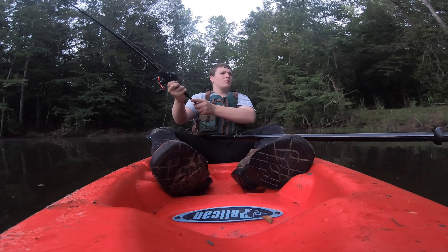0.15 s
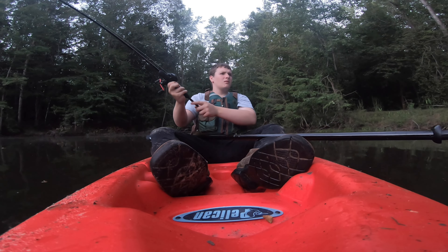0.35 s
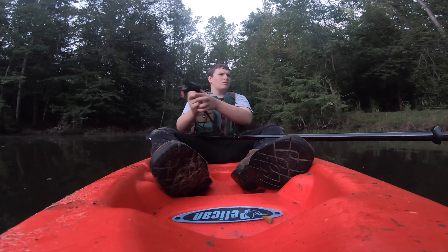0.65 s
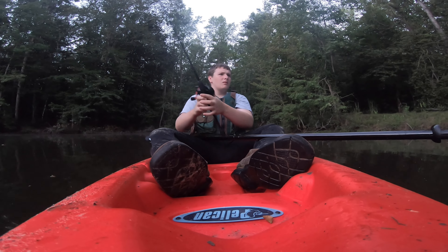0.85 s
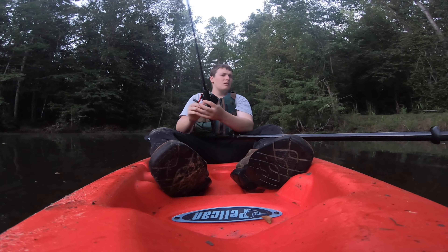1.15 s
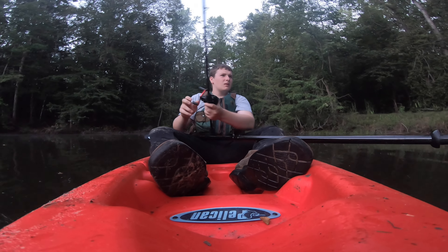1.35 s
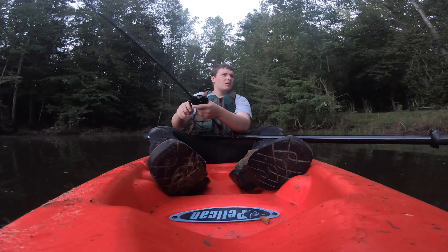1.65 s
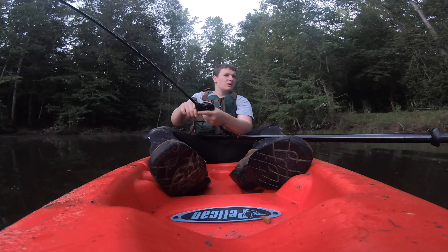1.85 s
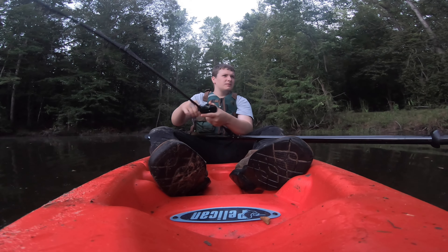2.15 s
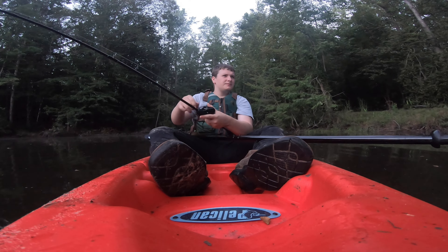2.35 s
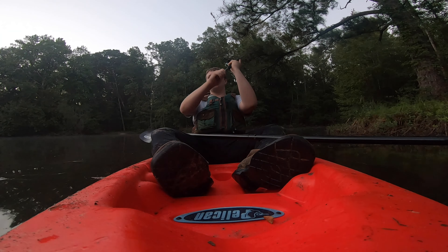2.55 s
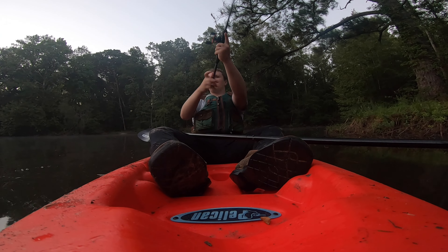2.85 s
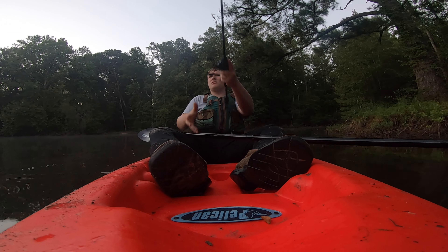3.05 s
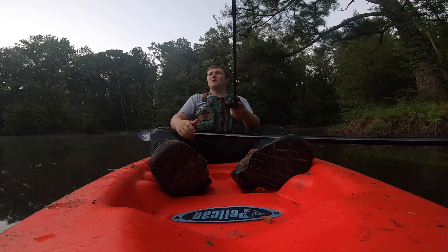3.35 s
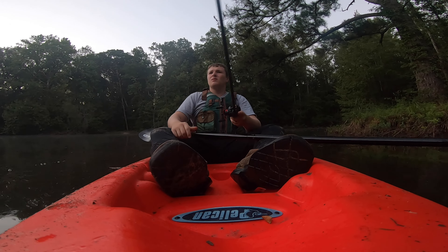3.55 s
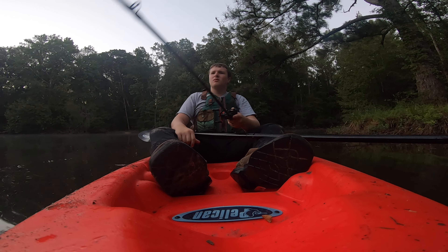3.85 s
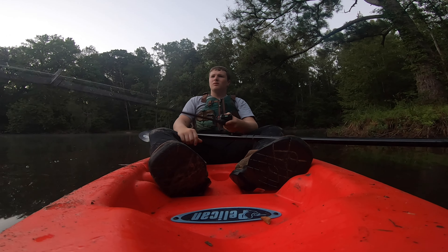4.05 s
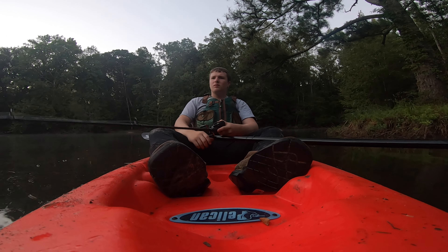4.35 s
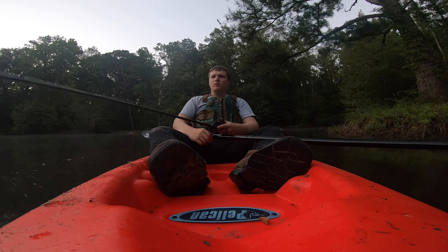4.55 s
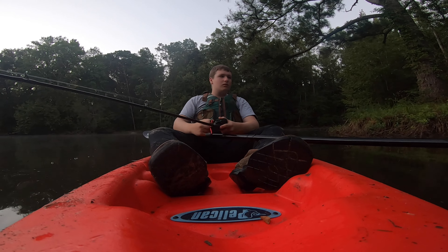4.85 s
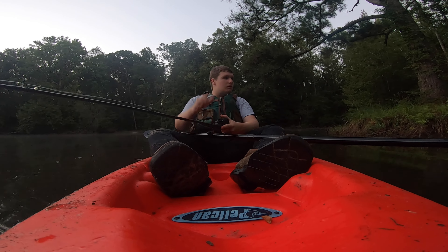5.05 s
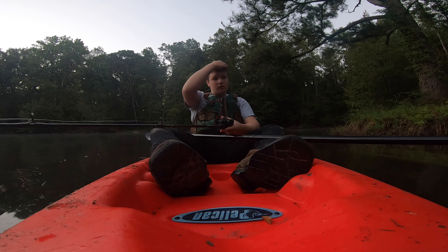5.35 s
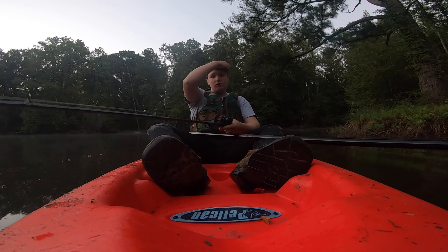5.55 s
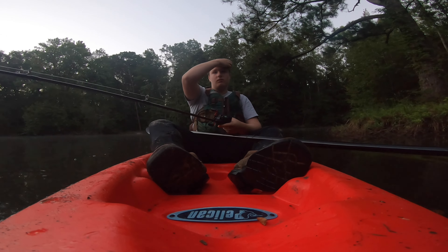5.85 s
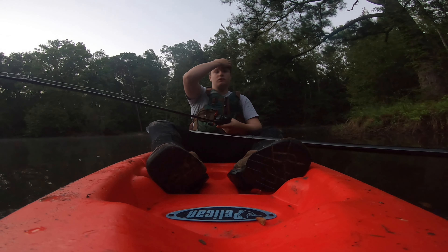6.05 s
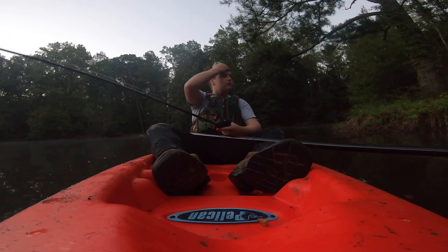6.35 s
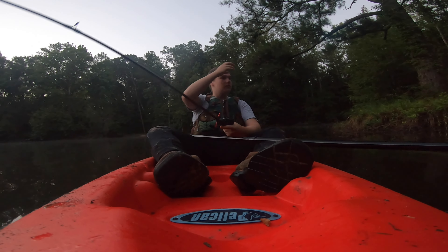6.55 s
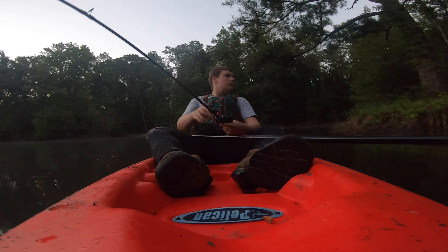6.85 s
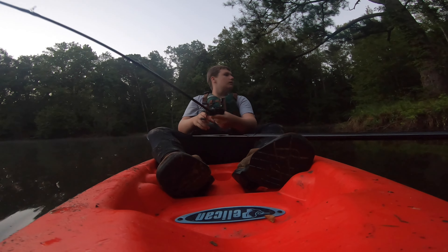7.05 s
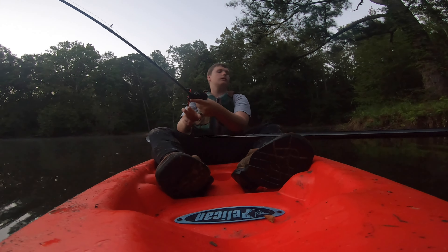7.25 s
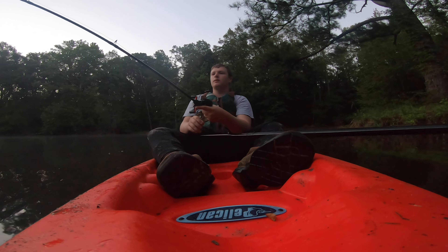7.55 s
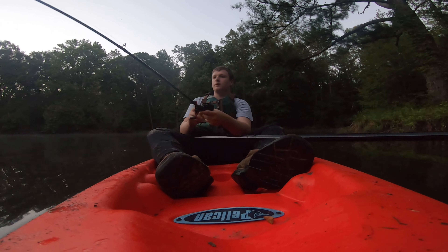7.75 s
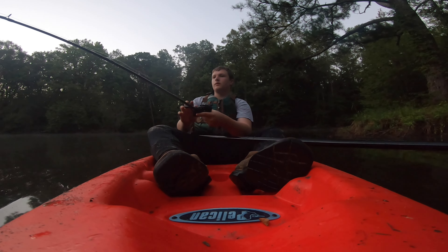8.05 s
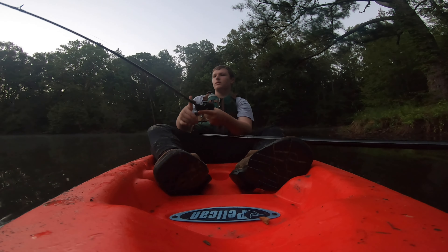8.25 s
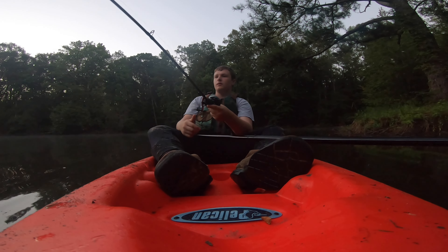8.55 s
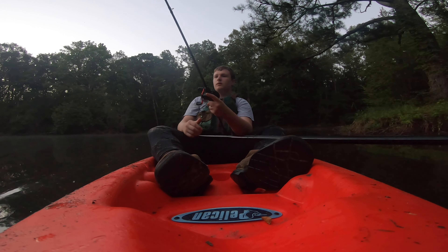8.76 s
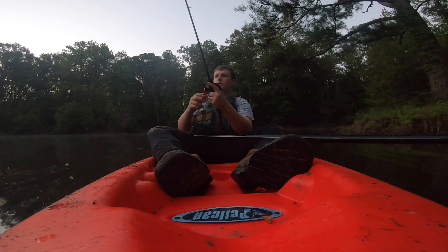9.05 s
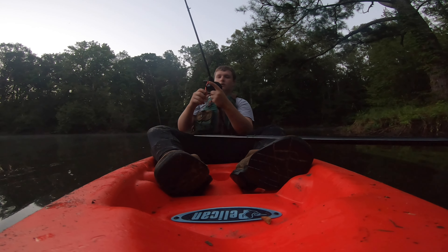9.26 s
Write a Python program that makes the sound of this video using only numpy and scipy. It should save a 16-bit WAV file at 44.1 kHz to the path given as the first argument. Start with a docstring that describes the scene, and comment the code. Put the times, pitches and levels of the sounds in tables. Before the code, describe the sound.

From a plastic kayak on a pond, a high, rasping insect buzzes over a constant insect chorus, with scattered frog twangs and far crows. A reel latch snaps and a cast follows with a brief hiss and whirr. The reel clicks again, and a paddle scrapes and squeaks close by, thumping the hollow hull. Then sleeves rustle, the frogs and crows call more often, and a small bird faintly repeats two slurred notes.

```python
"""Morning on a wooded pond, heard from the bow of a plastic kayak.
Far insects drone throughout; a near one buzzes first, scraper on file, as green frogs twang and crows caw.
An angler's reel latch clicks and he casts: the line hisses, the spool whirrs until his thumb stops it.
Then the paddle scrapes, squeaks and bumps on the hollow hull, and trapped air gulps underneath.
At the end frogs and crows grow busier, sleeves rustle and a small bird repeats two slurred notes."""
import sys
import numpy as np
from scipy import signal
from scipy.fft import rfft, irfft, next_fast_len
from scipy.io import wavfile

SR = 44100
rng = np.random.default_rng(int(sys.argv[2]) if len(sys.argv) > 2 else 0)


def transcribe(signal):
    """Save signal, clipped to [-1, 1], as a 16-bit WAV file at the path in sys.argv[1]."""
    frames = np.atleast_2d(signal).T
    limited = np.clip(frames, -1, 1)
    pcm = np.round(limited * 32767).astype(np.int16)
    wavfile.write(sys.argv[1], SR, pcm)


N = 414099
TIME, FREQS = np.arange(N) / SR, np.fft.rfftfreq(N, 1 / SR)


# paddle shoves: peak_s, rise_s, fall_s, scrape_db, rumble_db (all table levels are relative)
SHOVES = [(5.459, 0.075, 0.084, -38, -31), (5.735, 0.053, 0.062, -36, -32),
          (6.292, 0.055, 0.023, -38, -33.5)]
# shaft on plastic: freq_hz, density_db
SCRAPE_SPECTRUM = [(120, -38), (200, -5.5), (278, -2.5), (448, -11.5), (709, -7.5), (1080, -13.5),
                   (1320, -7.5), (1840, -19), (2020, -16.5), (2210, -17.5), (6880, -30.5), (10100, -35),
                   (16000, -44)]
# shaken hull: freq_hz, density_db
RUMBLE_SPECTRUM = [(12, -50), (20, -39), (38, -6.5), (125, 3), (147, -2.5), (173, -10.5), (206, -17),
                   (285, -13), (366, -20.5), (400, -20), (520, -50), (880, -120)]
RUMBLE_LINGER_S, ROCK_HZ = 0.031, 103

def paddle_scrape():
    """The shaft scrapes over plastic and shakes the hull, whose sides move oppositely below ROCK_HZ."""
    sliding = sum(amp(db) * shove(s, rise, fall) for s, rise, fall, db, _ in SHOVES)
    shaking = sum(amp(db) * shove(s, rise, fall + RUMBLE_LINGER_S) for s, rise, fall, _, db in SHOVES)
    scrape = amp(5.5) * sliding * noise(SCRAPE_SPECTRUM, right_db=0.5, same=0.1, grain_db=2)
    rumble = noise(RUMBLE_SPECTRUM, right_db=-6, same=0.2)
    rocking = lowpass(rumble[0], hz=ROCK_HZ, order=4) * np.array([[-.7], [1]])
    return scrape + shaking * (amp(2.5) * highpass(rumble, hz=ROCK_HZ) + amp(5) * rocking)


# stick-slip bursts: start_s, length_s, level_db, slips_per_s
SQUEAKS = [(5.7108, 0.0057, -13, 1100), (5.72, 0.022, -15, 1200), (5.739, .028, -18.5, 1020),
           (5.762, 0.026, -21.5, 1080)]
# paddle shaft: freq_hz, width_hz, level_db
SHAFT_MODES = [(1150, 100, -2), (1750, 160, -4.5), (2234, 140, 5.5), (2730, 360, -10), (3045, 170, 5),
               (3370, 310, 3.5), (4000, 220, -6.5), (6960, 900, -23)]
# deck: freq_hz, width_hz, level_db
DECK_MODES = [(820, 63, -19), (1000, 36, 0.5), (1135, 31, -13), (1290, 52, 10)]

def paddle_squeak():
    """The paddle sticks and slips fast enough to squeak, ringing shaft and deck."""
    slips = np.zeros(N)
    for s, length, db, rate in SQUEAKS:
        u = progress(length)
        cycles = np.cumsum(rate * (1 + .04 * drift(600, len(u)))) / SR
        jerks = unit(np.diff(np.floor(cycles), prepend=-1)) + .9 * rng.standard_normal(len(u))
        add(slips, s, amp(db) * jerks * np.interp(u, [0, .08, .55, 1], [0.31, 0.79, 0.73, 0.14]))
    slips = lowpass(slips, hz=8000, order=2)  # soft plastic rounds each slip
    deck = amp(-0.5) * ring(slips, DECK_MODES) * np.array([[-.9], [1]])  # halves flex oppositely
    shaft = amp(-2) * woods(ring(slips, SHAFT_MODES), near_db=-7.5, far_db=-36.5)
    return highpass(shaft + deck, hz=515)


# bumps on the hull: start_s, level_db, push_s
BUMPS = [(4.326, -60, 0.0056), (4.36, -40.5, 0.014), (5.421, -30, 0.0055), (5.469, -30, 0.0081),
         (5.717, -47, 0.0041), (5.804, -29, 0.015), (5.87, -31.5, 0.016), (6.3, -17, 0.013),
         (6.455, -32.5, 0.015), (7.258, -53, 0.0029), (8.471, -55.5, 0.0047)]
# hollow shell: freq_hz, width_hz, level_db
HULL_MODES = [(54.3, 3, 14), (90, 14, -16), (108, 14, 9), (140, 20, -9), (215, 35, -20)]

def hull_bumps():
    """Soft pushes ring the shell: the lowest mode rocks its sides oppositely, the rest swell it."""
    pushes = np.zeros(N)
    for s, db, length in BUMPS:
        push = np.hanning(max(round(length * SR), 4))
        add(pushes, s, amp(db + 33.5) * push / push.sum())
    rock = amp(-2) * ring(pushes, HULL_MODES[:1])
    swell = amp(-1) * ring(pushes, HULL_MODES[1:])
    return np.array([swell - amp(-6.5) * rock, swell + rock])


# course of the cast: time_s, hiss_db, spool_db
CAST_LEVELS = [(2.62, -69, -72), (2.78, -67, -62.5), (2.85, -48, -48.5), (2.906, -49, -53.5),
               (2.986, -58.5, -56.5), (3.338, -55, -61), (3.438, -57, -64), (3.838, -53.5, -64),
               (3.996, -59, -57), (4.07, -74, -59)]
# line in the guides: freq_hz, density_db
LINE_SPECTRUM = [(4500, -29), (6500, -7), (8500, 1), (9200, -8), (10200, -17.5), (11500, -15.5),
                 (15500, -20)]
# spinning spool: freq_hz, density_db
SPOOL_SPECTRUM = [(250, -16), (650, -2), (1000, -4.5), (1500, -7.5), (2200, -3), (2950, 1), (4000, -2),
                  (5500, -6), (8000, -28)]
SPOOL_START_S, SPOOL_STOP_S, BRAKE_S = 2.6, 4.01, 0.025
ZIP_HZ, ZIP_RISE_HZ_PER_S, ZIP_WIDTH_HZ = 7560, 1100, 1100
WHINE_HZ, WHINE_SAG_HZ_PER_S, FLUTTER_HZ = 723, 150, 2955

def cast():
    """Line hisses through the guides with a rising zip; the spool whirrs and slows till a thumb stops it."""
    since = TIME - SPOOL_START_S
    zipping = sine(ZIP_HZ + ZIP_RISE_HZ_PER_S * since) * np.array([drift(ZIP_WIDTH_HZ) for _ in range(2)])
    hiss = amp(2.5) * noise(LINE_SPECTRUM, right_db=11, same=0.19, grain_db=2.5)
    hiss += amp(-1.5) * place(zipping, right_db=8, same=0.18)
    whirr = amp(2) * noise(SPOOL_SPECTRUM, right_db=-0.5, same=0.68, grain_db=1.5)
    whine = amp(-13) * sine(WHINE_HZ - WHINE_SAG_HZ_PER_S * since) * (1 + .6 * drift(60))
    flutter = amp(-2) * np.sin(2 * np.pi * FLUTTER_HZ * TIME) * drift(520)
    spool = amp(3.5) * level(CAST_LEVELS, column=2) * (whirr + whine + flutter)
    brake = np.exp(-np.maximum(TIME - SPOOL_STOP_S, 0) / BRAKE_S)
    return brake * (level(CAST_LEVELS, column=1) * hiss + spool)


# single clicks of reel and rod: start_s, level_db, pawl_db, grip_db
CLICKS = [(.238, -62, 20, 3), (.885, -51, -8, -21), (4.008, -47, -12, 12), (4.3246, -39.5, -30, 8),
          (5.269, -52, 11, -2), (6.289, -39, -14, -8), (7.115, -53, 2, 9), (8.019, -42, -5, -6)]
# reel frame: freq_hz, width_hz, level_db
FRAME_MODES = [(2880, 87, 4), (3120, 250, 5.5), (4195, 1600, -4)]
# rod and grip: freq_hz, width_hz, level_db
GRIP_MODES = [(740, 200, 3), (1260, 37, 3), (1399, 290, 5.3)]
# steel pawl: freq_hz, width_hz, level_db
PAWL_MODES = [(8040, 860, 14), (8100, 610, 6.6)]

def reel_clicks():
    """Each click is a tiny rattle of parts that rings the frame, the hollow grip and the pawl."""
    frame, grip, pawl = np.zeros((3, N))
    t = np.arange(SR // 100) / SR
    for s, db, pawl_db, grip_db in CLICKS + latch_clicks():
        rattle = rng.choice([-1, 1], len(t)) * np.exp(-t / 0.0028)
        rattle[0] += 3  # first impact
        add(frame, s, amp(db) * rattle)
        add(pawl, s, amp(db + pawl_db) * rattle)
        add(grip, s, amp(db + grip_db) * rattle)
    ringing = amp(4) * ring(frame, FRAME_MODES) + amp(-0.5) * ring(grip, GRIP_MODES)
    ringing += amp(-3) * ring(pawl, PAWL_MODES)
    return place(woods(highpass(ringing, hz=685), near_db=-12, far_db=-30.5), right_db=0.5, same=0.8)


# latch throws: start_s, length_s, level_db, first_blow_db
LATCH_THROWS = [(2.1473, .0518, -21, -9.5), (4.7653, .067, -24, -3)]
# snap, strike, knock on the grip, rebound: length_share, level_db, pawl_db, grip_db
LATCH_BLOWS = [(0, -3, 14, 4), (.116, 0, -6.5, -14), (.297, -26.5, -15, 18.5), (1, -17.5, -17, -14)]

def latch_clicks():
    """Click rows for the reel's latch: every throw is the same run of blows, faster or slower."""
    return [(s + share * length, db + blow_db + (first_db if k == 0 else 0), pawl_db, grip_db)
            for s, length, db, first_db in LATCH_THROWS
            for k, (share, blow_db, pawl_db, grip_db) in enumerate(LATCH_BLOWS)]


# even, stumbling, then settled buzz: start_s, end_s, strokes_per_s, missed_share, level_db
BUZZ_BOUTS = [(0.014, 0.552, 78, 0, -39), (.565, 1.548, 91, .13, -39.5), (1.568, 2.53, 78, 0, -40.5)]

def near_insect():
    """Each wing stroke drags a scraper over a file: a short tone that slides downward."""
    out, t = np.zeros((2, N)), np.arange(round(.009 * SR)) / SR
    u = t / t[-1]
    sweep_hz = np.interp(u, [0, .25, .6, 1], [7050, 6320, 6070, 5490])
    envelope = np.interp(u, [0, .25, .55, .72, 1], [0.24, 0.48, 0.88, 0.53, 0])
    for start, end, rate, missed, db in BUZZ_BOUTS:
        for s in np.arange(start, end, 1 / rate):
            phase = 2 * np.pi * (np.cumsum(sweep_hz * rng.normal(1, 0.005)) / SR + rng.random())
            stroke = amp(db + rng.normal(4.4, 0.98)) * envelope * (rng.random() >= missed)
            add(out[0], s - t[-1] / 2, amp(-10) * stroke * np.cos(phase))  # far ear: shaded, out of step
            add(out[1], s - t[-1] / 2, stroke * np.sin(phase))
    return out


# green frog calls: start_s, level_db
TWANGS = [(0.177, -45), (.825, -55), (1.565, -41), (2.765, -39.5), (3.686, -44.5), (4.489, -38.5),
          (6.651, -44), (6.72, -46.5), (7.577, -43), (7.624, -42), (7.87, -40.5), (8.194, -41),
          (8.309, -43.5), (8.815, -53.5)]
# throat response: freq_hz, gain_db
FROG_THROAT = [(200, -5.5), (300, 4.5), (390, -4), (540, 2.5), (800, -4.5), (1050, -18), (1600, -20)]
FROG_HZ, FROG_FULL_DB, FROG_HZ_PER_DB = 166.76, -39, 0.83  # softer is slightly higher
FUNDAMENTAL_DECAY_S, OVERTONE_DECAY_S, OVERTONE_JITTER = 0.057, 0.054, 0.1706

def frogs():
    """A twang like a plucked string: a round fundamental under rough overtones that sag and die first."""
    out, t = np.zeros(N), np.arange(SR // 4) / SR
    for s, db in TWANGS:
        settled_hz = FROG_HZ + FROG_HZ_PER_DB * (FROG_FULL_DB - db)
        pitch_hz = settled_hz * (1 + .36 * np.exp(-t / .014) + .03 * drift(120, len(t)))
        body = amp(5) * np.sqrt(2) * sine(pitch_hz) * np.exp(-(t / FUNDAMENTAL_DECAY_S) ** 1.39)
        sagging_hz = pitch_hz * np.exp(-1.8 * t + OVERTONE_JITTER * drift(300, len(t)))
        twang = amp(3) * voice(sagging_hz, FROG_THROAT, tilt_db=-55 * t)
        twang *= (1 + 0.51 * drift(259, len(t))) * np.exp(-(t / OVERTONE_DECAY_S) ** 2)
        attack = 1 - np.exp(-t / 0.0017)
        add(out, s, amp(db - 5.5) * (body + twang) * attack)
    return place(woods(out, near_db=1, far_db=-10.5), right_db=-2, same=0.22)


# single crows: start_s, length_s, level_db
CAWS = [(1.172, 0.13, -54.5), (1.483, 0.12, -52.5), (1.912, .14, -50.5), (2.396, 0.069, -56.5),
        (2.475, 0.056, -52.5), (6.408, 0.21, -57.5), (6.601, 0.095, -58.5), (6.819, 0.16, -70),
        (7.028, 0.19, -55.5), (7.22, 0.23, -58.5), (7.423, .2, -55.5), (7.681, .22, -55.5),
        (7.961, 0.22, -59), (8.201, 0.28, -57.5), (8.9, 0.14, -59)]
# pitch of a caw: length_share, top_pitch_share
CAW_ARCH = [(0, .82), (.25, .95), (.45, 1), (.7, .92), (1, 0.77)]
# throat response: freq_hz, gain_db
CROW_THROAT = [(400, -33), (850, -22), (1150, 5), (1350, 5), (1750, -9.5), (2200, -25), (3000, -37)]
# far flock calling: start_s, end_s, level_db
FLOCK_SPELLS = [(1.2, 2.6, -68), (6.3, 9.39, -59)]
# far flock: freq_hz, density_db
FLOCK_SPECTRUM = [(950, -31), (1180, -2), (1360, 5), (1500, -12.5), (1750, -3.5), (2050, -32)]
CAW_TOP_HZ = 453.6

def crows():
    """Hoarse caws whose pitch arches and falls, over a flock blurred by distance."""
    out = np.zeros(N)
    for s, length, db in CAWS:
        u = progress(length)
        pitch_hz = CAW_TOP_HZ * (np.interp(u, *np.transpose(CAW_ARCH)) + .012 * drift(350, len(u)))
        hoarse = 1 + .42 * drift(300, len(u))
        caw = voice(pitch_hz, CROW_THROAT) * hoarse * signal.windows.tukey(len(u), .5)
        add(out, s, amp(db - 2.5) * caw)
    calling = spells(FLOCK_SPELLS, ramp_s=.15, fade_db_per_s=1.5) * amp(2 * drift(21))
    flock = calling * noise(FLOCK_SPECTRUM, right_db=0.5, same=0.097)
    return flock + woods(out, near_db=-12, far_db=-11)


# lone notes: start_s, length_s, level_db, start_hz, middle_hz, end_hz
WHISTLES = [(0.18, 0.3, -60, 1560, 1598, 1550), (0.57, 0.02, -57, 1060, 963, 935),
            (.662, 0.064, -61.5, 740, 774, 1000), (1.01, .024, -58, 5050, 4784, 4800)]
# one bird's repeated phrase: start_s, level_db
PHRASES = [(8.11, -69), (8.57, -69), (9.043, -66)]
# its slurs, up then down: delay_s, length_s, level_db, start_hz, middle_hz, end_hz
SLURS = [(0, 0.087, 0.5, 2650, 2800, 2880), (0.127, 0.095, -1.5, 2204, 2206, 1816)]

def songbirds():
    """Slurred whistles with a slight quaver, alone or paired in a phrase."""
    out = np.zeros(N)
    song = [(s + delay, length, db + note_db, *slur)
            for s, db in PHRASES for delay, length, note_db, *slur in SLURS]
    for s, length, db, start_hz, middle_hz, end_hz in WHISTLES + song:
        u = progress(length)
        pitch_hz = middle_hz + (np.where(u < .5, start_hz, end_hz) - middle_hz) * (2 * u - 1) ** 2
        quaver = 1 + .011 * drift(250, len(u))
        add(out, s, amp(db + 1.5) * sine(pitch_hz * quaver) * signal.windows.tukey(len(u), .3))
    return woods(out, near_db=5, far_db=-8)


# limbs on the seat: start_s, length_s, level_db
SEAT_RUBS = [(0.269, 0.065, -50), (1.307, 0.17, -49), (1.52, 0.13, -50.5), (4.206, 0.25, -55.5),
             (4.801, 0.24, -48), (7.02, 0.3, -51), (7.22, 0.15, -48.5), (7.36, 0.25, -52.5),
             (8.376, 0.081, -52)]
# rubbed seat: freq_hz, density_db
SEAT_SPECTRUM = [(60, 1), (150, 6), (300, -2), (600, 1.5), (1000, -3), (1500, -0.5), (2200, -13),
                 (4000, -25.5)]
# sleeves, vest and reel handle: start_s, length_s, level_db
RUSTLES = [(0, 0.073, -52.5), (.22, 0.13, -66), (.45, 0.9, -74), (1.3, 0.18, -61.5), (1.5, .35, -68.5),
           (2.41, 0.16, -64.5), (4.39, .06, -65), (4.84, .2, -67.5), (6.5, 0.17, -75), (6.95, .35, -66.5),
           (7.38, .22, -76), (8.195, .2, -60), (8.38, .08, -68), (8.5, 0.075, -75), (8.72, 0.31, -88)]
# cloth: freq_hz, density_db
CLOTH_SPECTRUM = [(150, 1.5), (400, -9), (800, -26), (1500, -4.5), (3000, 6.5), (4700, 5), (8000, -4),
                  (10500, -10), (15000, -25)]
# vest as an arm goes up: start_s, length_s, level_db
CRINKLES = [(5.225, 0.35, -47.5)]
SNAPS_PER_S = 550

def handling():
    """Dull rubs on the seat, grainy rustle of cloth and hands, and the tiny snaps of a crinkling vest."""
    rubs = strokes(SEAT_RUBS) * noise(SEAT_SPECTRUM, right_db=0.5, same=0.36, grain_db=2)
    rustle = amp(8) * strokes(RUSTLES) * noise(CLOTH_SPECTRUM, right_db=1, same=0.92, grain_db=2.5)
    snaps = rng.standard_normal(N) * (rng.random(N) < SNAPS_PER_S / SR)
    crinkle = strokes(CRINKLES) * unit(ring(snaps, modes=[(2000, 670, -6), (4800, 4200, 0)]))
    return rubs + rustle + crinkle


# water gulps: start_s, length_s, level_db, start_hz
GULPS = [(0.921, 0.12, -48.5, 130.4), (5.955, 0.086, -47.5, 302)]

def gulps():
    """A pocket of air trapped under the hull rings and rises a little in pitch."""
    out = np.zeros(N)
    for s, length, db, hz in GULPS:
        u = progress(length)
        add(out, s, amp(db) * sine(hz * (1 + 0.16 * u)) * np.sin(np.pi * u))
    return out


# lower insect band: freq_hz, density_db
LOW_CHORUS = [(2400, -23.5), (3050, -11.5), (3350, -5.5), (3600, -0.5), (3850, -9.5), (4150, -17.5),
              (4800, -50)]
# upper insect band: freq_hz, density_db
HIGH_CHORUS = [(5200, -38.5), (5900, -11), (6350, -5.5), (6650, 2.5), (7000, -0.5), (7550, 1), (7850, -6),
               (8200, -15.5), (9200, -27.5), (10500, -30)]
# thin, high insect: start_s, end_s, level_db
THIN_SPELLS = [(0, 3.8, -73.5), (4.0, 9.39, -67.5)]

def far_insects():
    """Countless insects blur into two wavering bands; a thin, higher one calls in spells."""
    low = amp(-63 + drift(12)) * noise(LOW_CHORUS, right_db=1, same=0.9)
    trend_db = np.interp(TIME, [2.5, 2.56, 9.39], [.8, -.5, -.8])
    high = amp(-54 + 1.18 * drift(25) + trend_db) * noise(HIGH_CHORUS, right_db=12, same=0.05)
    thin = noise([(7600, -72), (8200, -5), (8520, 8), (8850, 0), (9800, -60)], right_db=11.5, same=0.12)
    return low + high + spells(THIN_SPELLS, ramp_s=.1, fade_db_per_s=2.2) * thin


# open air: freq_hz, density_db
AIR_SPECTRUM = [(20, -22), (80, -7), (125, -10.5), (175, 3.5), (260, -7.5), (400, -16.5), (700, -13),
                (1000, -18.5), (1400, -15), (2400, -28), (5000, -24.5), (8500, -61), (11000, -68),
                (16000, -57)]

def air():
    """Still air over the pond: a faint hush that swells a little."""
    return amp(-59.5 + 1.2 * drift(6.3)) * noise(AIR_SPECTRUM, right_db=-0.5, same=0.12)


# echo among the trees: freq_hz, t60_s
WOODS_DECAY = [(150, 1.14), (600, 0.31), (1400, 1.9), (3000, 0.77), (9000, 0.14)]

def woods(x, near_db, far_db):
    """Direct sound, quick scatter off water and bank, and a long echo from the trees."""
    t = np.arange(SR) / SR
    near = rng.standard_normal((2, SR)) * np.exp(-t / 0.012)
    diffuse = rng.standard_normal((2, SR)) * (1 - np.exp(-t / 0.0095))
    hz, when, bands = signal.stft(diffuse, SR, nperseg=256)
    decay = amp(-60 * when / read(WOODS_DECAY, hz)[:, None])
    far = signal.istft(bands * decay, SR, nperseg=256)[1][:, :SR]
    echo = (amp(near_db) * unit(near) + amp(far_db) * unit(far)) / np.sqrt(SR)
    echo[:, 0] += 1
    return signal.oaconvolve(x[None], echo / np.linalg.norm(echo[0]), axes=1)[:, :N]


# pressure of a rub: length_share, gain
STROKE_PRESSURE = [(0, 0.28), (.2, 0.54), (.6, 0.66), (1, 0.1)]

def strokes(rows):
    """Gain over time of rubs that press, hold and let go."""
    share, gain = np.transpose(STROKE_PRESSURE)
    return sum(amp(db) * np.interp((TIME - s) / length, share, gain, left=0, right=0)
               for s, length, db in rows)


def shove(peak_s, rise_s, fall_s):
    """Gain over time of one push that builds and dies away."""
    from_peak = np.maximum(peak_s - TIME, 0) / rise_s + np.maximum(TIME - peak_s, 0) / fall_s
    return np.exp(-from_peak ** 1.23)  # exponent 1 is pointed, 2 round


def spells(rows, ramp_s, fade_db_per_s):
    """Gain over time of callers that join in, slowly tire and stop."""
    return sum(amp(db - fade_db_per_s * np.maximum(TIME - start, 0))
               * np.interp(TIME, [start, start + ramp_s, end, end + ramp_s], [0, 1, 1, 0])
               for start, end, db in rows)


def level(rows, column):
    """Gain over time from one dB column, silent outside the rows."""
    rows = np.array(rows)
    return amp(np.interp(TIME, rows[:, 0], rows[:, column], left=-150, right=-150))


def voice(hz, throat, tilt_db=0):
    """Seven harmonics of a pitch curve shaped by a throat; tilt is per harmonic."""
    phase = 2 * np.pi * np.cumsum(hz) / SR
    return unit(sum(amp(read(throat, k * hz) + tilt_db * (k - 2.5))
                    * np.sin(k * phase + rng.uniform(0, 2 * np.pi)) for k in range(1, 8)))


def ring(x, modes):
    """Drives damped modes (freq_hz, width_hz, level_db) whose joint response has energy 1."""
    t = np.arange(SR // 2) / SR
    response = sum(amp(db) * width * np.exp(-np.pi * width * t) * np.sin(2 * np.pi * hz * t)
                   for hz, width, db in modes)
    return signal.oaconvolve(x, response / np.linalg.norm(response))[:N]


def noise(spectrum, right_db, same, grain_db=0):
    """Coloured stereo noise; grain clumps it into tiny snaps."""
    size = next_fast_len(N)
    white = rng.standard_normal((2, N)) * amp(grain_db * drift(900))
    colour = amp(read(spectrum, np.fft.rfftfreq(size, 1 / SR)))
    coloured = irfft(rfft(white, size) * colour, size)[:, :N]
    return place(unit(coloured), right_db, same)


def place(pair, right_db, same):
    """Two signals become left and right; same blends the left into the right."""
    right = same * pair[0] + np.sqrt(1 - same ** 2) * pair[1]
    return np.array([pair[0] * amp(-right_db / 2), right * amp(right_db / 2)])


def drift(hz, size=N):
    """Random curve of rms 1 that changes about hz times a second."""
    return unit(np.interp(np.arange(size) * hz / SR, np.arange(size), rng.standard_normal(size)))


def read(points, hz):
    """A curve's value at hz, on a log-frequency axis."""
    f, value = np.transpose(points)
    return np.interp(np.log(hz + 1), np.log(f + 1), value)


def add(mix, start_s, sound):
    part = mix[max(round(start_s * SR), 0):][:len(sound)]
    part += sound[:len(part)]


def highpass(x, hz):
    return signal.sosfilt(signal.butter(4, hz, "high", fs=SR, output="sos"), x)


def lowpass(x, hz, order):
    return signal.sosfilt(signal.butter(order, hz, fs=SR, output="sos"), x)


def sine(pitch_hz):
    return np.sin(2 * np.pi * np.cumsum(pitch_hz) / SR)


def progress(length_s):
    return np.linspace(0, 1, round(length_s * SR))


def amp(db):
    return 10 ** (np.asarray(db) / 20)


def unit(x):
    """Scales to rms 1."""
    return x / np.sqrt(np.mean(x ** 2) + 1e-20)


def scene():
    """Pond, angler and kayak together."""
    pond = air() + far_insects() + near_insect() + frogs() + crows() + songbirds()
    angler = reel_clicks() + cast() + handling()
    kayak = paddle_scrape() + paddle_squeak() + hull_bumps() + gulps()
    return pond + angler + kayak


def record(dry):
    """The microphone's housing dulls the top octave; the band is limited at both ends."""
    housing = amp(read([(9500, -1.0), (11500, -14.5), (15000, -17.5)], FREQS))
    dulled = irfft(rfft(dry) * housing, N)
    treble_cut = signal.firwin(511, cutoff=15800, window=("kaiser", 9), fs=SR)
    return signal.oaconvolve(highpass(dulled, hz=27), treble_cut[None], "same")


dry = scene()
out = record(dry)
transcribe(out)
```